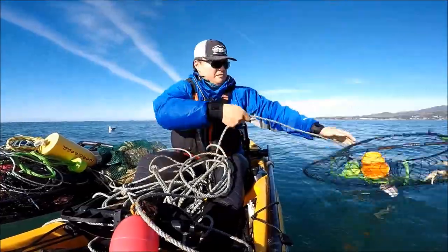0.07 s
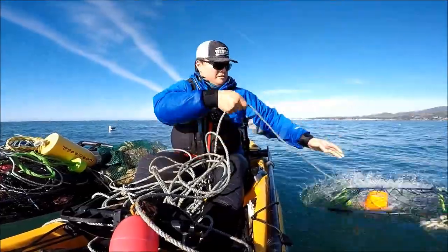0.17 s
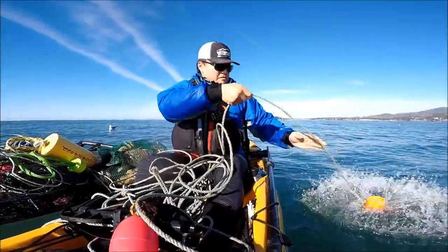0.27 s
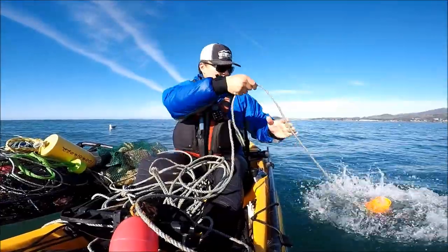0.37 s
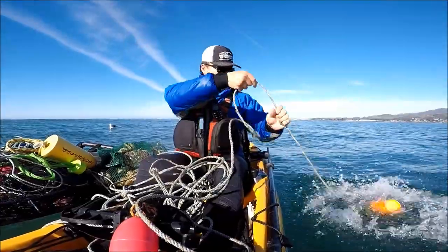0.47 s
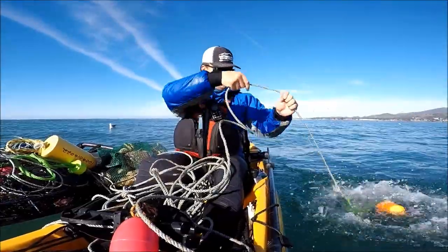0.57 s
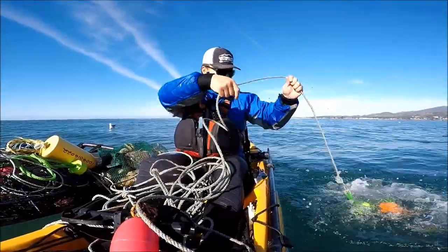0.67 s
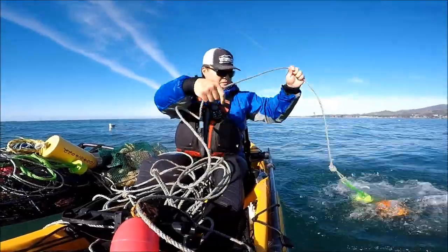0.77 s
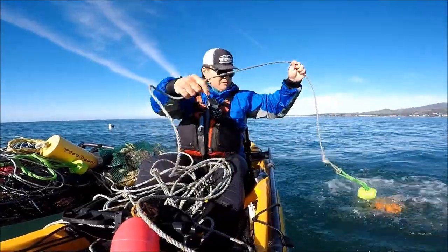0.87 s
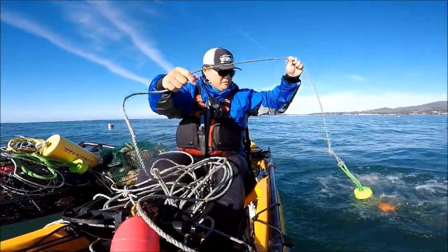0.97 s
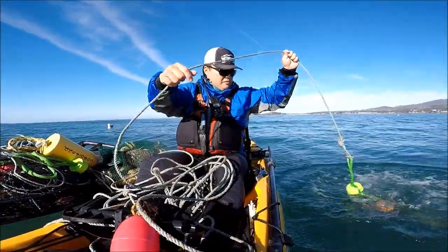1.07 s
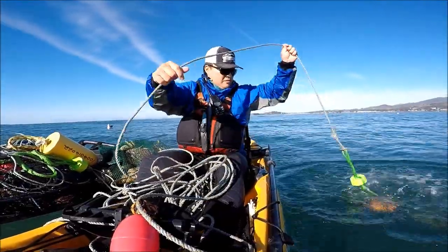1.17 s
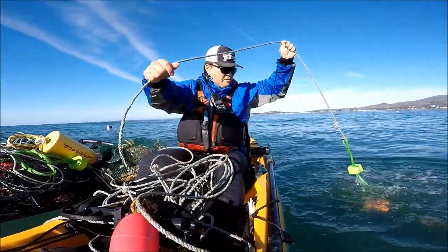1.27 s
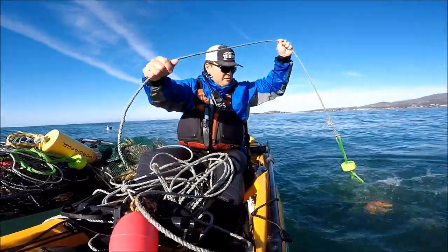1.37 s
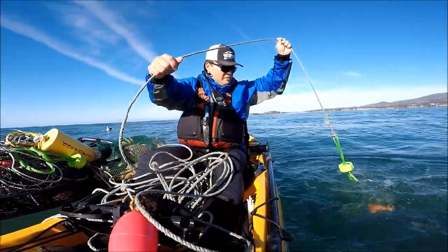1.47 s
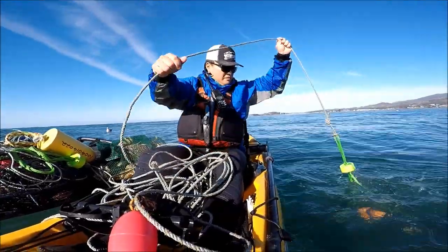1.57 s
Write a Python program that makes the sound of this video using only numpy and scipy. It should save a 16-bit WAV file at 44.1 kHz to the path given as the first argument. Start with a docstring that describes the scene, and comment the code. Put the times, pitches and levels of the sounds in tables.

```python
"""A hoop net slaps the sea, rim first (cracks and spray: dense clicks, hiss and a crowd of drop pings), then its
weighted middle churns air under (a crowd of low pings). Faint rustle of the net leaving the hands comes first.
Single bubbles plop and close drops tick (gliding sines); a rope knocks a kayak hull once (ringing modes).
Light wind buffets a housed camera microphone (coloured noise) over a deep rumble."""
import sys
import numpy as np
from scipy import signal
from scipy.fft import rfft, irfft
from scipy.io import wavfile
from scipy.ndimage import uniform_filter1d

SR = 44100
rng = np.random.default_rng(int(sys.argv[2]) if len(sys.argv) > 2 else 0)


def transcribe(signal):
    """Save signal, clipped to [-1, 1], as a 16-bit WAV file at the path in sys.argv[1]."""
    frames = np.atleast_2d(signal).T
    limited = np.clip(frames, -1, 1)
    pcm = np.round(limited * 32767).astype(np.int16)
    wavfile.write(sys.argv[1], SR, pcm)


N = 72765
T = np.arange(N) / SR


def gain_of(db):
    """Amplitude gain of a level in dB."""
    return 10 ** (np.asarray(db) / 20)


def evened(x):
    """Scales x to rms 1."""
    return x / np.sqrt(np.mean(x ** 2) + 1e-20)


def level(curve):
    """Gain along a (time_s, level_db) curve, -120 dB outside it."""
    time_s, level_db = np.transpose(curve)
    return gain_of(np.interp(T, time_s, level_db, left=-120, right=-120))


def coloured(x, tone):
    """Filters x by a (freq_hz, relative_db) curve, falling 28 dB/octave more beyond its ends; rms 1."""
    freq_hz, relative_db = np.transpose(tone)
    octave = np.log2(np.fft.rfftfreq(N, 1 / SR) + 1)
    below = np.maximum(np.log2(freq_hz[0]) - octave, 0)
    above = np.maximum(octave - np.log2(freq_hz[-1]), 0)
    filter_db = np.interp(octave, np.log2(freq_hz), relative_db) - 28 * (below + above)
    return evened(irfft(rfft(x) * gain_of(filter_db), N))


def scatter(per_s, spread_db):
    """Random clicks of either sign, a few of them large."""
    size = gain_of(spread_db * np.minimum(rng.exponential(1, N), 4.2))
    sign = rng.choice([-1., 1.], N)
    return size * sign * (rng.random(N) < per_s / SR)


def add(mix, start_s, sound):
    """Adds sound into mix in place, cut at the end."""
    part = mix[round(start_s * SR):][:len(sound)]
    part += sound[:len(part)]


def ping(pitch_hz, peak_db, rise_s, t60_s, climb_oct_per_s=0.):
    """A sine that swells, dies away exponentially and glides."""
    t = np.arange(0, rise_s + t60_s, 1 / SR)
    swell = np.sin(np.pi / 2 * np.minimum(t / rise_s, 1)) ** 2
    decay = gain_of(peak_db - 60 * np.maximum(t - rise_s, 0) / t60_s)
    phase = 2 * np.pi * np.cumsum(pitch_hz * 2 ** (climb_oct_per_s * t)) / SR
    return swell * decay * np.sin(phase)


def crowd(low_hz, high_hz, per_s, spread_db, cycles_per_20db, climb_oct_per_20db):
    """Short pings of 32 pitches at random moments, each rising a little; rms 1."""
    clicks = scatter(per_s, spread_db)
    pitch_index = rng.integers(0, 32, N)
    out = np.zeros(N)
    for k, hz in enumerate(np.geomspace(low_hz, high_hz, 32)):
        decay_20db_s = cycles_per_20db / hz
        grain = ping(hz, 0, 1.06 / hz, 3 * decay_20db_s, climb_oct_per_20db / decay_20db_s)
        out += signal.oaconvolve(clicks * (pitch_index == k), hz * grain)[:N]  # gain grows with pitch
    return evened(out)


# deep rumble spectrum: freq [Hz], relative density [dB per Hz]
RUMBLE_TONE = [(15, 5), (30, 1), (46, 6.5), (70, 4.5), (95, -2), (115, -8), (135, -38)]
# rumble level: time [s], level [dB]
RUMBLE_LEVEL = [(0, -78), (.13, -56), (.17, -53), (.3, -52), (.45, -47), (.75, -46), (1.2, -39.5),
                (1.33, -57), (1.39, -40), (1.5, -37.5), (1.65, -42)]


def rumble():
    """Low noise whose level wanders."""
    return coloured(rng.standard_normal(N), RUMBLE_TONE) * level(RUMBLE_LEVEL)


# wind and distant sea spectrum: freq [Hz], relative density [dB per Hz]
WIND_TONE = [(95, -59), (112, -75), (124, -10.5), (150, -1), (200, -4.5), (260, -8.5), (400, -12.5),
             (600, -20.5), (800, -25.5), (1200, -31.5), (1700, -33.5), (2600, -44.5), (3900, -40),
             (5500, -48), (9000, -43), (11500, -47), (13500, -54), (15600, -61)]
# wind level: time [s], level [dB]
WIND_LEVEL = [(0.0, -37.5), (0.142, -37.5), (0.464, -38), (0.798, -36.5), (0.932, -38), (1.046, -36.5),
              (1.65, -36)]
GUST_RMS_DB, GUST_CORNER_HZ = 1, 76


def wind():
    """Lumpy buffeting over a faint wide hiss: noise swelled by slower noise, then coloured."""
    lowpass = signal.butter(2, GUST_CORNER_HZ, fs=SR)
    gusts = evened(signal.lfilter(*lowpass, rng.standard_normal(N)))
    lumpy = rng.standard_normal(N) * gain_of(GUST_RMS_DB * gusts)
    return coloured(lumpy, WIND_TONE) * level(WIND_LEVEL)


# contacts within the one knock: start [s], level [dB], tilt (hardness) [dB per octave], contact decay [s]
KNOCKS = [(1.3677, -32, 4.5, 0.0039), (1.3776, -20, 1.4, 0.003), (1.399, -27, -6, .006)]
# hull modes: pitch [Hz], relative level [dB], t60 [s]
HULL_MODES = [(254, 0.5, 0.11), (589, 2, 0.051), (718, -8.5, 0.063), (952, -9.5, 0.053), (1265, -11, 0.03),
              (1950, -22, 0.028), (2570, -19, 0.022), (3320, -23.5, 0.039)]
KNOCK_RISE_S, KNOCK_ROUGH_PER_KHZ = 0.0011, .35


def rope_knock():
    """Wet rope drags against the plastic hull: each mode rings cleanly and under decaying noise."""
    out = np.zeros(N)
    for start_s, knock_db, tilt_db, contact_s in KNOCKS:
        fade = np.exp(-np.arange(1000) / SR / contact_s)
        drag = rng.standard_normal(1000) * fade / np.sqrt(contact_s * SR / 2)
        for pitch_hz, mode_db, t60_s in HULL_MODES:
            ring_db = mode_db + knock_db + tilt_db * np.log2(pitch_hz / 500)
            ring = ping(pitch_hz, ring_db, KNOCK_RISE_S, t60_s)
            add(out, start_s, ring)
            add(out, start_s, KNOCK_ROUGH_PER_KHZ * pitch_hz / 1000 * np.convolve(drag, ring))
    return out


# single drops landing close by: start [s], pitch [Hz], peak [dB], t60 [s]
TICKS = [(0.233, 1850, -50, 0.027), (.2926, 3900, -16.5, 0.042), (.301, 1950, -14.5, 0.013),
         (0.344, 2060, -27, 0.019), (0.531, 1260, -23, 0.02), (.562, 13500, -44, .004),
         (.637, 12800, -37, .006), (.665, 13500, -38, .005), (0.6645, 3840, -31.5, .012),
         (0.7233, 3640, -27, 0.026), (.781, 7200, -37, .005), (0.8624, 3830, -32, 0.016),
         (0.884, 3070, -37, 0.0082), (.901, 8900, -38, 0.0023), (.96, 8700, -41, 0.004),
         (.5532, 1830, -25.5, 0.017), (.619, 8950, -40, .005), (.7427, 1880, -36, 0.019),
         (.7527, 6660, -40, 0.0058), (.7851, 1450, -36, 0.032), (.8585, 1480, -37, 0.022),
         (.8739, 6500, -43, 0.0042), (.9732, 1800, -41, .02), (1.042, 1600, -41, 0.021),
         (1.067, 2930, -42.5, 0.028), (1.083, 1890, -43.5, 0.044), (1.105, 2290, -39.5, 0.017),
         (1.1443, 1780, -39.5, 0.03), (1.1676, 3260, -43.5, 0.016), (1.207, 3100, -34.5, 0.019),
         (1.214, 3670, -38.5, 0.013), (.7238, 4080, -27.5, 0.01), (.8995, 2170, -40, .015),
         (.2955, 1064, -17.5, 0.06), (.533, 2100, -24, 0.01), (.698, 7000, -39, 0.0077),
         (.687, 8500, -41, .004), (.724, 12800, -45, .004), (.797, 8050, -41, .005),
         (.874, 11400, -45, .004), (.583, 8400, -41, .008), (.74, 7000, -47, .005), (.513, 8700, -49, .005),
         (1.207, 4350, -45, 0.0089), (.8835, 3800, -35, .012), (1.206, 3940, -32.5, 0.012),
         (1.208, 2180, -37.5, 0.037)]


def drop_ticks():
    """Abrupt pings, each climbing an eighth of an octave per t60."""
    out = np.zeros(N)
    for start_s, pitch_hz, peak_db, t60_s in TICKS:
        add(out, start_s, ping(pitch_hz, peak_db, 0.00044, t60_s, 1 / (8 * t60_s)))
    return out


# single air pockets: start [s], start pitch [Hz], peak [dB], rise [s], t60 [s], climb [octaves per s]
BUBBLES = [(0.307, 185, -11, 0.017, 0.092, -11), (0.373, 207, -17.5, 0.012, 0.047, -4),
           (.398, 602, -17, 0.0077, 0.031, -9), (.413, 590, -13, 0.0049, 0.024, -7),
           (.394, 1123, -23.5, 0.002, 0.053, 4), (.578, 715, -28.5, 0.0049, 0.036, -1),
           (.311, 522, -16, 0.0086, 0.055, 7), (.337, 448, -12, 0.0076, 0.061, 13.5),
           (.366, 502, -11.5, .005, 0.057, 20), (.426, 551, -8, 0.0062, 0.028, 6.5),
           (.452, 306, -12.5, 0.0033, 0.015, -34), (.466, 204, -25.5, 0.0027, 0.14, -20.5),
           (.474, 970, -21.5, 0.0059, 0.039, 4), (.818, 531, -27, 0.0043, .1, 25),
           (.921, 790, -33.5, 0.0036, 0.042, -1.5), (1.029, 677, -31, 0.002, 0.059, 4),
           (1.168, 980, -36.5, 0.0063, 0.028, 9), (1.176, 387.5, -32.5, 0.014, 0.11, 18),
           (.362, 726, -26, 0.0046, 0.046, 3), (.44, 718, -19, 0.0029, 0.044, 11)]


def bubble_plops():
    """Each air pocket rings as a decaying sine gliding up or down."""
    out = np.zeros(N)
    for start_s, pitch_hz, peak_db, rise_s, t60_s, climb_oct_per_s in BUBBLES:
        add(out, start_s, ping(pitch_hz, peak_db, rise_s, t60_s, climb_oct_per_s))
    return out


# churned air spectrum: freq [Hz], relative density [dB per Hz]
CHURN_TONE = [(120, -31), (200, 6.5), (231, -4), (329, -5.5), (579, -1.5), (702, -6.5), (1160, -14),
              (1500, -24.5), (1950, -57), (3300, -120)]
# churn level: time [s], level [dB]
CHURN_LEVEL = [(.22, -64), (.236, -32.5), (.282, -31), (.296, -32.5), (.316, -16.5), (.35, -19.5),
               (.385, -18.5), (.39, -25.5), (.42, -20), (.445, -20.5), (.47, -27), (.505, -38.5),
               (.62, -38.5), (.75, -41.5), (.85, -60), (1.0, -46), (1.2, -61), (1.4, -78)]
POCKETS_PER_S, POCKET_SPREAD_DB = 1100, 1.5
POCKET_CYCLES_PER_20DB, POCKET_CLIMB_OCT_PER_20DB = 4.6, 0.12


def churn():
    """Air pockets dragged under by the net: a crowd of low rising pings."""
    pockets = crowd(228.5, 1473, POCKETS_PER_S, POCKET_SPREAD_DB,
                    POCKET_CYCLES_PER_20DB, POCKET_CLIMB_OCT_PER_20DB)
    return coloured(pockets, CHURN_TONE) * level(CHURN_LEVEL)


PATCH_RMS_DB, PATCH_S, PATCH_HZ = 1.8, .02, 900


def patchy(x):
    """Random louder and softer patches over time and pitch."""
    spectrum = signal.stft(x, nperseg=256, noverlap=192)[2]
    field = uniform_filter1d(rng.standard_normal(spectrum.shape), round(PATCH_S * SR / 64), 1)
    field = evened(uniform_filter1d(field, round(PATCH_HZ * 256 / SR), 0))
    return signal.istft(spectrum * gain_of(PATCH_RMS_DB * field), nperseg=256, noverlap=192)[1][:N]


# spray spectrum as heard through the housing: freq [Hz], relative density [dB per Hz]
SPRAY_TONE = [(410, -82), (700, -6), (737, -0.5), (807, -6.5), (1130, -5), (1470, -15), (1610, -6.5),
              (1950, -6.5), (2110, -6), (2280, -7), (2460, -12.5), (3150, -11), (3500, -14.5), (3980, -7.5),
              (4590, -21.5), (5160, -19), (5800, -27), (6690, -22), (8790, -19.5), (10000, -29),
              (12500, -29), (14800, -34.5), (15600, -50)]
# spray level: time [s], level [dB]
SPRAY_LEVEL = [(.215, -72), (.226, -36), (.236, -25.5), (.266, -30), (.289, -27.5), (.297, -22),
               (.334, -25.5), (.39, -27), (.442, -27), (.486, -34), (.622, -37.5), (.674, -37),
               (.71, -40.5), (.735, -37), (.77, -43.5), (.814, -43.5), (.846, -49.5), (.87, -42),
               (.948, -50), (.976, -43), (.992, -51.5), (1.1, -50.5), (1.2, -49.5), (1.21, -48),
               (1.232, -54), (1.344, -52), (1.38, -48.5), (1.4, -50.5), (1.65, -62)]
# net leaving the hands: time [s], level [dB]
RUSTLE_LEVEL = [(0.0, -71), (0.014, -47), (0.028, -53), (0.114, -47.5), (0.154, -60), (0.21, -54)]
DROPS_PER_S, DROP_SPREAD_DB = 3000, 2.8
DROP_CYCLES_PER_20DB, DROP_CLIMB_OCT_PER_20DB = 5.6, 0.085
SHEET_SHARE = 0.57  # hiss against drops


def spray_and_rustle():
    """A sheet of fine hiss with a patter of drops, each of its own pitch; the rustle shares this sound."""
    drops = crowd(671, 14860, DROPS_PER_S, DROP_SPREAD_DB,
                  DROP_CYCLES_PER_20DB, DROP_CLIMB_OCT_PER_20DB)
    sheet = rng.standard_normal(N)
    water = patchy(SHEET_SHARE * sheet + (1 - SHEET_SHARE) * drops)
    return coloured(water, SPRAY_TONE) * (level(SPRAY_LEVEL) + level(RUSTLE_LEVEL))


# hoop meets water: start [s], initial level [dB rms], t60 [s]
SLAPS = [(0.2355, -21.5, 0.049), (0.2915, -23.5, 0.05), (0.3015, -24, 0.02)]
CRACKS_PER_S, CRACK_SPREAD_DB = 11000, 3.5


def hoop_slaps():
    """Dense random clicks in the spray's colour, cracking at once and dying fast."""
    envelope = np.zeros(N)
    for start_s, level_db, t60_s in SLAPS:
        envelope += level([(start_s, level_db), (start_s + t60_s, level_db - 60)])
    return coloured(scatter(CRACKS_PER_S, CRACK_SPREAD_DB), SPRAY_TONE) * envelope


def scene():
    """All layers summed, the same on both channels."""
    water = spray_and_rustle() + hoop_slaps() + churn()
    details = bubble_plops() + drop_ticks() + rope_knock()
    mono = water + details + wind() + rumble()
    return np.array([mono, mono])


TREBLE_HZ, RIGHT_LEAN, BALANCE_WAVER = 11730, 0.27, 0.72  # waver is rms, both as shares of the treble
EDGE_HZ = 15550


def record(dry):
    """The top treble is louder on the right and its balance wavers randomly; then the band limit."""
    top = signal.oaconvolve(dry[0], signal.firwin(101, TREBLE_HZ, pass_zero=False, fs=SR), "same")
    waver = evened(signal.lfilter(*signal.butter(2, 300, fs=SR), rng.standard_normal(N)))
    side = (BALANCE_WAVER * waver - RIGHT_LEAN) * top
    stereo = dry + np.array([side, -side])
    band_limit = signal.firwin(1023, EDGE_HZ, window=("kaiser", 9), fs=SR)
    return signal.oaconvolve(stereo, band_limit[None], "same")


dry = scene()
out = record(dry)
transcribe(out)
```